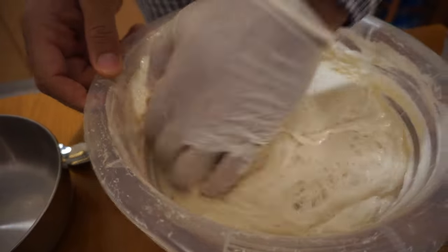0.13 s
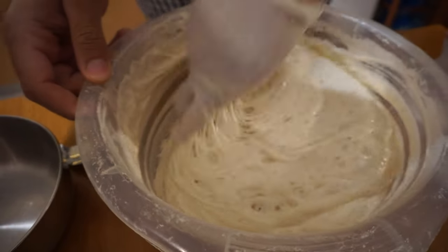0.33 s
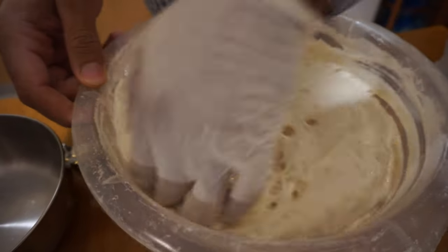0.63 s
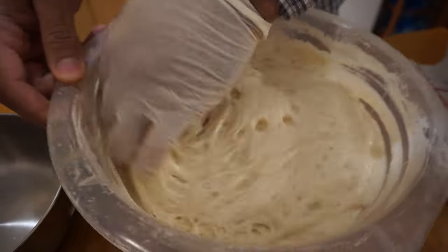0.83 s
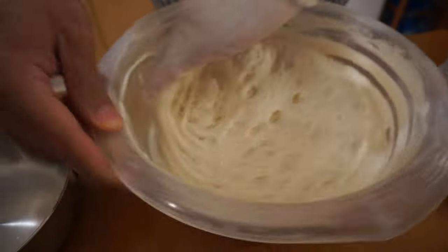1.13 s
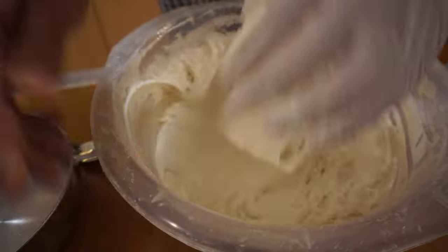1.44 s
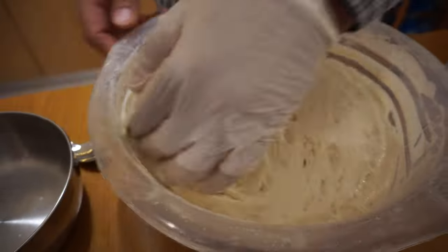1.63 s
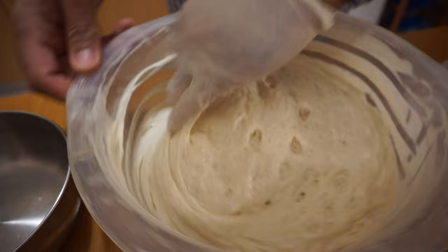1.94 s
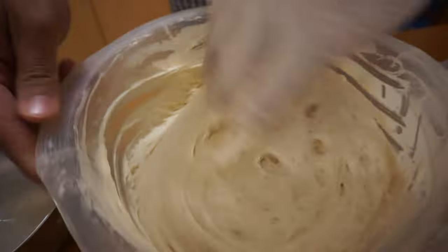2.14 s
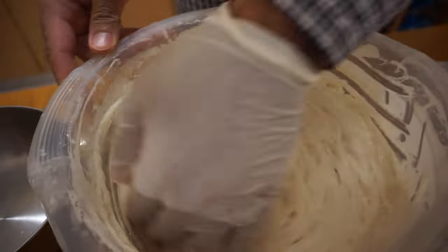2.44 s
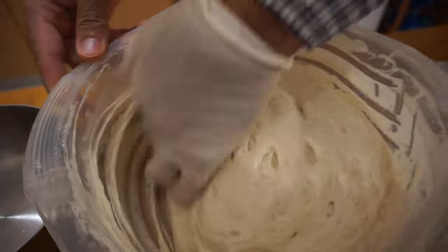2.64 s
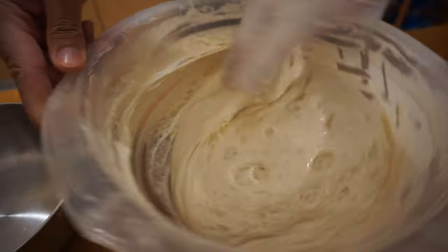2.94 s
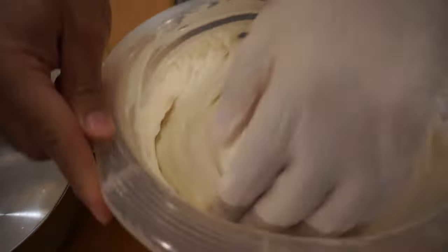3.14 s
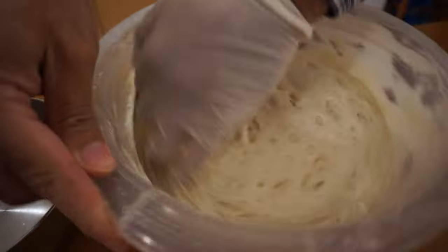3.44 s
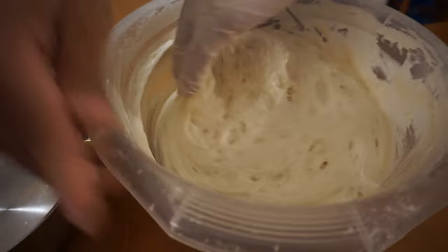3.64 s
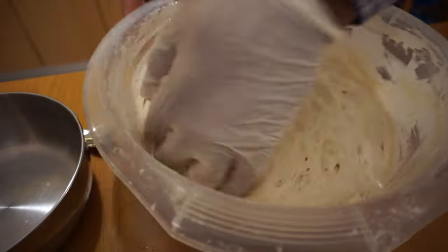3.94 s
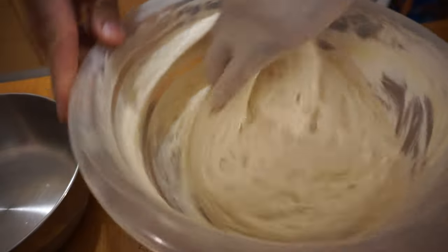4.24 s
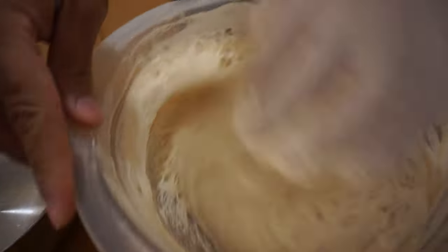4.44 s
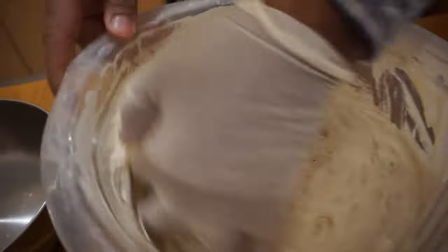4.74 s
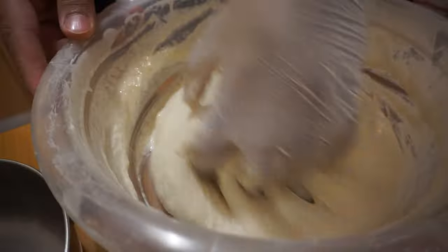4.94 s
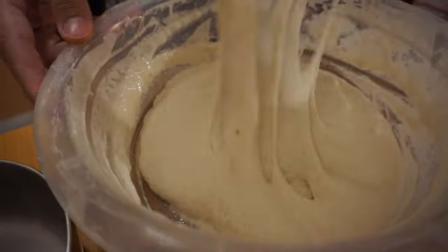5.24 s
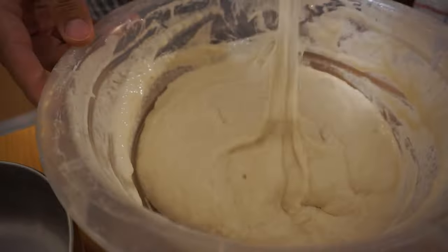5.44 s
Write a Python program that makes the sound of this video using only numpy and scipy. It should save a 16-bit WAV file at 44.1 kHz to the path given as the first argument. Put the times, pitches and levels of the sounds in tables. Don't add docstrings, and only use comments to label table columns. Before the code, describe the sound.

A gloved hand drags and folds wet, airy dough around a plastic bowl in quick repeated sweeps. Rasping, squelchy tearing comes with tiny snaps and bursting bubbles. The bowl thuds on a wooden table, hardest just after two and three seconds, and briefly brushes a metal pan handle early on. It ends with quiet sticky strands letting go. Close stereo microphones in a small kitchen, with faint room tone and slight echo.

```python
import sys
import numpy as np
from scipy import signal
from scipy.fft import rfft, irfft, next_fast_len
from scipy.io import wavfile

SR = 44100
rng = np.random.default_rng(int(sys.argv[2]) if len(sys.argv) > 2 else 0)


def unload_audio(sound):
    columns = np.transpose(np.atleast_2d(sound))
    steps = np.round(np.clip(columns, -1, 1) * 32767)
    wavfile.write(sys.argv[1], SR, steps.astype(np.int16))


def magnitude_from_level(level_db):
    exponent = np.asarray(level_db, float) / 20
    return 10 ** exponent


N = 246846

# [f/Hz, density/dB per Hz]
ROOM_TONE = [(15, -43), (25, 6.5), (95, -10), (238, -5), (288, -10), (339, -12.5), (1250, -20),
             (1680, -15.5), (3810, -30.5), (15200, -16.5), (16500, -41)]
ROOM_TONE_DB = -52.5
# [f/Hz, share/1]
COMMON_SHARE = [(100, 0.98), (250, 0.57), (500, 0.82), (1000, 0.81), (2000, 0.65), (4000, 0.092),
                (8000, 0.074), (14000, 0.25)]
# [f/Hz, left-right/dB]
LEAN = [(60, 3.5), (110, -1), (200, -1.5), (380, 1.5), (700, -1), (1290, -1.5), (2380, -3.5), (4400, 1),
        (8120, -2), (15000, -6)]
RIGHT_LAG_SAMPLES = 2
KITCHEN_DECAY_SCALE_S, KITCHEN_DB = 0.93, -14.5

# [f/Hz, level/dB, t60/s]
HANDLE_MODES = [(2132, 1, .2), (5630, -1, .045), (9920, -6, .02), (10900, -8, .02), (13100, -9, .015),
                (15500, -7, .012)]
# [t/s, rise/s, fall/s, level/dB, high modes/dB]
HANDLE_BRUSHES = [
    (.2, .01, 0.066, -40.5, 4),
    (.255, 0.04, 0.02, -35.5, -16),
    (3.07, 0.022, 0.031, -45.5, -16),
]
# [t/s, rise/s, fall/s, level/dB]
RIM_FLICKS = [
    (2.347, 0.0047, 0.024, -14.5),
    (2.42, 0.15, 0.11, -31),
]
# [f/Hz, width/Hz, level/dB]
RIM_RESONANCES = [(10800, 2200, 0), (14800, 900, -6)]

# [t/s, rise/s, fall/s, level/dB]
ROCKS = [
    (2.28, 0.044, 0.069, -32.5),
    (2.39, .02, 0.027, -40),
]
ROCKING_HZ = 161
# [f/Hz, width/Hz, [t/s, rise/s, fall/s, level/dB]]
HELD_MODES = [
    (413.7, 12, [(2.69, 0.023, 0.099, -42.5), (3.56, 0.038, 0.077, -49.5)]),
    (267, 96, [(2.335, 0.007, 0.22, -42), (4.44, 0.0103, 0.031, -37)]),
    (378, 100, [(3.158, .004, 0.049, -38.5)]),
    (1060, 440, [(1.3, 0.1, .08, -48)]),
    (640, 280, [(3.162, 0.0087, 0.17, -39.5), (2.215, .01, 0.055, -39)]),
    (753, 150, [(.34, 0.08, 0.3, -47.5)]),
    (1080, 250, [(.33, .1, 0.084, -44)]),
    (1680, 360, [(1.5, 0.085, .12, -60.5), (5.14, 0.056, 0.23, -54.5), (5.5, 0.67, .6, -65)]),
    (220, 42, [(5.17, 0.04, 0.15, -52), (5.43, 0.27, 0.032, -54)]),
]
# [f/Hz, level/dB, t60/s]
BOWL_MODES = [(64, -22.5, .2), (155, -3.5, .11), (132, -14, .05), (218, -13, .1), (255, -12, .1),
              (297, -17, .08), (524, -22, .06), (560, -23, .05), (640, -18, .06), (770, -22, .04),
              (960, -22, .03), (1130, -24, .03), (1700, -28, .015), (2300, -26, .012)]
# [t/s, peak/dB, hardness/dB, weight on worktop/dB]
KNOCKS = [(0.092, -32, -10, -3), (0.964, -30.5, 11.5, -15), (1.031, -25.5, -8, -2), (1.617, -37, 9, -3),
          (2.099, -28, 17.5, -16), (2.117, -23, -6, -13), (2.195, -40, 5, -8), (2.2031, -12, -5, 6.5),
          (2.2168, -20.5, -16, 7), (2.326, -14.5, -7, -20), (3.153, -9.5, 2, -7), (3.181, -22, -26, -2),
          (3.882, -43, -12, 0), (3.949, -37, -12, 2), (4.371, -25, 14, -29), (4.389, -30, 21.5, -18),
          (4.4414, -20.5, -3, -31), (4.471, -28, -4, -22), (4.537, -37, 13, -9), (4.717, -36.5, 0, 5),
          (4.932, -33, 2, 0.5)]
GRIP_DAMPING = 0.57

# [f/Hz, width/Hz, [t/s, rise/s, fall/s, level/dB]]
FILMS = [
    (8400, 2900, [(.684, 0.016, 0.027, -42), (.86, .15, 0.097, -49), (1.95, 0.3, .15, -49), (3.47, 0.14, .04, -46), (4.38, .01, 0.024, -39), (4.68, 0.011, .05, -38.5), (4.77, 0.13, 0.11, -42)]),
    (3900, 630, [(1.1, .1, .3, -45), (3.55, .03, .06, -44), (3.89, .01, .02, -51)]),
    (10500, 1800, [(.205, .015, .06, -41), (.285, .03, .04, -44)]),
    (12900, 7700, [(2.9, .015, .05, -45), (3.528, .01, .055, -37), (6.8, .025, .03, -45), (4.59, 0.033, .04, -44), (1.628, .012, .015, -50), (0.595, .12, .05, -50), (4.47, .1, .1, -51), (2.78, .06, .08, -46), (3.8, .05, .04, -51), (3.61, .04, .09, -53)]),
    (2100, 1700, [(4.6, .06, 0.079, -50), (2.355, .015, .03, -50), (1.2, 0.073, 0.068, -59), (5.13, .05, .06, -50)]),
    (5000, 4200, [(5.38, .4, 0.7, -62.5), (3.79, .1, .1, -63), (1.5, .08, .08, -61)]),
    (2500, 350, [(5.45, 0.23, .3, -64)]),
    (1680, 200, [(5.4, 0.22, 0.46, -63), (0.51, 0.18, 0.18, -64)]),
    (700, 150, [(.48, .2, 0.18, -59)]),
]
# [t/s, peak/dB, f/Hz, ring width over pitch/1, left-right/dB]
SNAPS = [(.1915, -30, 5650, .3, -2), (.2477, -28, 9000, 1.2, -1), (.2845, -22, 10500, .5, 0),
         (0.3444, -25, 4500, 0.46, -1), (.6307, -29, 11500, .5, -3), (.6364, -21, 4500, 1.6, -1),
         (0.639, -26, 11500, 0.33, -5), (0.639, -19.5, 11400, 0.27, -13), (0.6398, -20.5, 5000, 1.7, 3),
         (.6443, -30, 11000, .4, -3), (.6525, -33, 497, 0.92, 0), (.6787, -30, 6500, .8, 0),
         (0.686, -28, 4500, 1, 0), (.7917, -25, 9000, 1.2, 0), (1.486, -35, 8800, 0.3, -16),
         (1.5328, -35, 12500, 0.62, -12), (1.584, -41, 10600, .4, -6), (1.622, -37, 1700, .5, 0),
         (2.3255, -19, 1710, 0.32, -5), (3.2344, -25, 7800, .5, -4), (3.3037, -22.5, 11300, 0.82, -7),
         (4.6515, -26, 12500, .4, -9), (4.7233, -32, 850, 0.64, -1), (4.8082, -13, 9000, 1.8, -4),
         (4.8095, -11, 8500, 1.2, -4), (4.8095, -12, 13500, .7, -5), (4.539, -34, 4200, 0.76, -7),
         (3.6365, -26, 3600, .9, 0), (3.95, -37.5, 990, 0.36, 0), (3.915, -34, 2200, .5, 0),
         (2.745, -33, 13000, .8, -2), (4.3737, -26, 2500, 0.53, -1), (.838, -32, 9000, .5, 2),
         (.8685, -31, 9500, 0.44, 2), (2.2064, -19, 2300, 0.42, 0), (4.8093, -21, 3020, 0.37, -4),
         (4.9417, -27, 11500, .5, -8), (4.954, -32, 2300, .4, -4), (5.204, -43, 1750, .3, -5)]
# [t/s, peak/dB, f/Hz, ring width over pitch/1]
MORE_SNAPS = [(2.2073, -22.5, 3900, 1.1), (3.891, -34, 3150, 0.11), (3.897, -38, 3100, .15),
              (3.908, -39, 3400, .2), (3.9135, -35, 1400, .6), (3.919, -35, 2500, .6),
              (4.6497, -36, 11000, 1.2), (4.6535, -36, 4000, .3), (4.6573, -30, 8000, 1.5),
              (4.3812, -34, 1300, 0.7), (3.1572, -23, 666, 0.21), (3.17, -27, 700, .35),
              (4.9459, -24, 7300, 1.1), (4.9423, -30, 13000, .6)]
# [t/s, peak/dB, f/Hz, crack over pocket/dB, left-right/dB]
POPS = [(0.09, -25.5, 2920, -1, -4), (0.344, -26.5, 1210, -5, -1.1), (0.6394, -24, 2420, -6, 1),
        (0.6874, -28, 3560, -8, 6), (1.486, -55, 1730, 15, -13), (2.4324, -27, 1720, -10.5, -1.5),
        (3.2345, -25, 3900, -5, -3), (3.6368, -23, 1400, -18, -5), (3.8845, -32.5, 4200, -10, 20),
        (4.1067, -23, 1590, -11, 0), (4.373, -40, 1150, 7, 2), (4.539, -19, 1680, -14, -8),
        (4.59, -21, 2040, -24, -10), (4.6957, -26, 3580, -9, -5), (4.8096, -34, 3070, 0, -2),
        (4.9459, -18, 2600, 4, -12), (5.002, -29, 2660, -12, 3)]
POP_BREADTH, BREADTH_PER_DB = 1.05, .006
# [t/s, peak/dB, f/Hz, left-right/dB]
THREADS = [(0.102, -35, 1950, -2), (0.334, -35, 1820, 2.1), (0.63, -40, 1208, -1), (0.7914, -40, 1790, -1),
           (0.8384, -37, 2590, 2), (0.8685, -40, 2730, 12), (1.3616, -29.5, 1150, -4),
           (1.6496, -36.5, 3700, -.6), (3.267, -32, 2500, -11), (4.562, -40, 2230, -3.5),
           (4.9765, -33, 2300, -4), (5.0674, -23, 3570, 2), (5.098, -38, 2500, -3), (5.1562, -36, 1940, -5),
           (5.187, -40, 1690, -12), (5.286, -40.5, 1760, -6), (5.354, -43, 2380, -2.5),
           (5.5023, -37.5, 2070, -5)]
# [t/s, peak/dB, f/Hz, crack/dB, left-right/dB]
SLAPS = [
    (2.2063, -21.5, 1820, -20, 8),
    (2.326, -36, 1600, -24, -7),
    (3.1557, -14.5, 1970, -37, -3),
]
# [t/s, peak/dB, left-right/dB]
TICKS = [
    (0.6414, -23, -6),
    (4.6529, -27, -11),
]
# [t/s, peak/dB, f/Hz]
SMACKS = [
    (2.2056, -14.5, 665),
    (2.325, -21.5, 617),
    (3.156, -17.5, 560),
    (4.373, -30, 700),
    (4.4435, -29.5, 640),
    (4.539, -23, 626),
]

# [t of peak speed/s, rise/s, fall/s, level/dB]
SLIDES = [(0.003, 0.82, 0.019, -44.5), (0.088, 0.0071, 0.92, -46), (0.201, 0.05, 0.22, -37),
          (0.634, 0.014, 0.6, -47.5), (1.032, 0.086, 0.32, -36.5), (1.276, 0.68, 0.21, -42),
          (1.778, 0.19, 0.566, -43.5), (2.002, 0.29, 0.2, -38), (2.194, 0.036, 0.1, -46.5),
          (2.345, 0.012, 0.4, -42.5), (2.694, 0.16, 0.12, -40.5), (2.879, 0.17, 0.67, -45.5),
          (3.154, 0.028, 0.24, -41), (3.54, 0.25, 0.06, -36.5), (3.657, 0.88, 0.11, -52.5),
          (3.88, 0.0041, 0.34, -46), (4.003, 0.018, 0.071, -39.5), (4.234, 0.37, 0.18, -38.5),
          (4.374, 0.0069, 0.094, -42), (4.818, 0.37, 0.3, -39.5), (5.111, 0.084, 0.19, -50.5)]
# [topmost hiss/dB, left-right/dB]
SLIDE_COLOUR = [(-3, -4), (1, -1), (0, 2.5), (1.5, 1), (-4, -2.5), (-0.5, 0.5), (-1.5, 1), (-4.5, 0.5),
                (0, 0), (2, 1), (1.5, 1.5), (-0.5, -1), (-6, -1), (0.5, -0.5), (4, 0.5), (0.5, 0), (-6, 0),
                (-1, 0.5), (0, -0.5), (-2, 0.5), (3.5, -2.5)]
# [t of peak force/s, rise/s, fall/s, level/dB, wetness/dB]
FOLDS = [(-0.033, 0.012, 0.064, -42.5, -12), (0.099, 0.021, 0.086, -48, 0),
         (0.295, 0.19, 0.23, -45.5, -1.5), (0.631, 0.043, 0.08, -45, -0.5), (0.777, 0.11, 0.22, -48, 0),
         (1.33, 0.6, 0.19, -46, -0.5), (1.702, 0.1, 0.9, -53.5, 4.5), (2.016, 0.16, 0.22, -43, -3),
         (2.206, 0.028, 0.11, -38.5, -7), (2.329, 0.025, 0.4, -42, -4.5), (2.685, 0.11, 0.34, -39.5, -2.1),
         (3.15, 0.0047, 0.076, -38, -4), (3.167, 0.48, 0.032, -46, 2.5), (3.543, 0.026, 0.12, -48.5, 14.5),
         (3.626, 0.57, 0.18, -41.5, -0.1), (3.905, 0.032, 0.087, -52, 5.5), (4.154, 0.25, 0.49, -41, 1),
         (4.374, 0.013, 0.037, -40.5, 4), (4.594, 0.22, 0.068, -42.5, -0.5),
         (4.737, 0.047, 0.065, -41.5, -2.5), (4.875, 0.14, 0.16, -40, -3), (5.13, 0.38, 0.066, -56.5, 7.5)]
# [t of peak weight/s, rise/s, fall/s, level/dB]
SHIFTS = [(0.088, 0.0087, 0.64, -52), (0.628, 0.079, 0.49, -46.5), (1.033, 0.21, 0.53, -47),
          (1.619, 0.0079, 0.66, -48.5), (2.103, 0.019, 0.068, -41), (2.21, 0.02, 0.096, -32.5),
          (2.527, 0.663, 0.018, -52.5), (3.16, 0.0067, 0.16, -33.5), (3.478, 0.65, 0.022, -50),
          (3.801, 0.049, 0.021, -52), (3.96, 0.13, 0.86, -57), (4.449, 0.17, 0.076, -40),
          (5.011, 0.54, 0.11, -48.5), (5.162, 0.038, 0.26, -50.5), (5.439, 0.11, 0.02, -66)]
# [t/s, rise/s, fall/s, level/dB]
TEARS = [(.686, 0.014, 0.026, -43), (2.28, .06, 0.077, -52), (2.5, 0.069, 0.031, -59),
         (2.625, 0.038, 0.019, -37), (2.674, .006, .07, -38), (3.524, .004, .06, -36),
         (2.8, .008, 0.018, -57), (.64, .012, .03, -40.5), (5.1, .004, 0.015, -57), (3.7, .03, 0.021, -46),
         (1.616, .004, .04, -52), (1.45, .08, .1, -62), (5.16, .04, 0.088, -60)]
SETTLING_DB = -64
SWELL_DB, SWELL_ROUNDNESS = 20, 1.4
SLIDE_IN_WALL_DB, SLIDE_IN_SQUELCH_DB, FOLD_IN_HISS_DB = -12, -5, -9.5
FOLD_IN_DRAG_DB, DRAG_DB = -7.5, 6
# [f/Hz, density/dB per Hz]
SMEAR_SPECTRUM = [(190, -37), (330, -6), (370, -8.5), (408, -18.5), (473, -7), (689, -0.5), (1160, -4.5),
                  (2770, -3.5), (3370, -16), (3780, -3), (14200, -7), (15700, -15), (16500, -35)]
# [f/Hz, width/Hz, gain/dB]
HOLLOW = [(418, 106, -3), (634, 63, 3.5), (1113, 244, 4), (1670, 88, 2), (2390, 580, 2.5), (3850, 340, 2.5),
          (6300, 520, -2), (7930, 630, 1.5), (10400, 3600, 1)]


def rms_one(x):
    return x / np.sqrt(np.mean(x ** 2) + 1e-20)


def sides(left_right_db):
    return magnitude_from_level(left_right_db / 2 * np.array([[1], [-1]]))


def at_hz(points, hz):
    table = np.array(points)
    return np.interp(np.log(hz), np.log(table[:, 0]), table[:, 1])


def high_pass(x, order, hz):
    return signal.sosfilt(signal.butter(order, hz, "high", fs=SR, output="sos"), x)


def soft(x, hz):
    r = np.exp(-2 * np.pi * hz / SR)
    return signal.lfilter([(1 - r) ** 2], [1, -2 * r, r * r], x)


def resonate(x, hz, width_hz):
    r = np.exp(-np.pi * width_hz / SR)
    poles = [1, -2 * r * np.cos(2 * np.pi * hz / SR), r * r]
    return signal.lfilter([(1 - r * r) / 2, 0, (r * r - 1) / 2], poles, x)


def resonate_twice(x, hz, width_hz):
    return resonate(resonate(x, hz, width_hz), hz, width_hz)


def ring(clicks, hz, t60_s):
    r = magnitude_from_level(-60 / (t60_s * SR))
    w = 2 * np.pi * hz / SR
    return signal.lfilter([0, np.sin(w)], [1, -2 * r * np.cos(w), r * r], clicks + 1e-18)


def drift(rate_hz):
    r = np.exp(-16 * np.pi * rate_hz / SR)
    slow = signal.lfilter([1], [1, -2 * r, r * r], rng.standard_normal(N // 8 + 4002))[4000:]
    return np.interp(np.arange(N) / 8, np.arange(len(slow)), rms_one(slow))


def slips(per_s, spread_db, length_s):
    happens = rng.random(N) < per_s / SR
    sizes = magnitude_from_level(spread_db * np.minimum(rng.exponential(1, N), 5)) * happens
    return rms_one(signal.lfilter([1], [1, -np.exp(-1 / (length_s * SR))], sizes))


def swells(rows, extra=False):
    t, power = np.arange(0, N + 32, 32) / SR, 1e-12
    for peak_s, rise_s, fall_s, level_db, *more_db in rows:
        away = np.maximum((peak_s - t) / max(rise_s, .002), (t - peak_s) / max(fall_s, .002))
        power = power + magnitude_from_level(2 * (level_db + extra * sum(more_db) - SWELL_DB * away ** SWELL_ROUNDNESS))
    return np.interp(np.arange(N) / SR, t, power)


def two_ears(x):
    size = next_fast_len(N + 64)
    turn = np.exp(-2j * np.pi * np.arange(size // 2 + 1) / size * RIGHT_LAG_SAMPLES)
    late = irfft(rfft(x, size) * turn, size)
    return np.array([x, late[:N]])


def banded(excite, spectrum, low_hz, level_db, patchy_db):
    out = np.zeros((2, N))
    edges = np.geomspace(low_hz, 16500, round(2.3 * np.log2(16500 / low_hz)))
    white = excite * rng.standard_normal((2, 3, N))
    common = [two_ears(w[0]) for w in white]
    own = [w[1:] for w in white]
    for k, (low, high) in enumerate(zip(edges, edges[1:])):
        hz = np.sqrt(low * high)
        share = np.clip(at_hz(COMMON_SHARE, hz), 0, 1)
        mixed = np.sqrt(share) * common[k % 2] + np.sqrt(1 - share) * own[k % 2]
        band = signal.sosfilt(signal.butter(2, [low, high], "band", fs=SR, output="sos"), mixed)
        gain = magnitude_from_level(at_hz(spectrum, hz)) * sides(at_hz(LEAN, hz))
        out += gain * magnitude_from_level(level_db(hz) + patchy_db * drift(18.6)) * band
    return out


def room_tone():
    return magnitude_from_level(ROOM_TONE_DB) * rms_one(banded(1, ROOM_TONE, 25.4, lambda hz: 0, patchy_db=-2.5))


def kitchen(x):
    size = next_fast_len(N + SR // 2)
    hz = np.arange(size // 2 + 1) * SR / size
    heard, out = rfft(x, size), np.zeros((2, size // 2 + 1), complex)
    low_cut = hz ** 2 / (hz ** 2 + 900 ** 2)
    for k, lag_s in enumerate(rng.uniform(.008, .035, 12)):
        loss = magnitude_from_level(-60 * lag_s / KITCHEN_DECAY_SCALE_S * (4.0 + hz / 9000))
        loop = loss * np.exp(-2j * np.pi * hz * lag_s)
        out[k % 2] += heard * loop / (1 - loop) * (-1) ** (k // 2) * low_cut
    return irfft(out, size)[:, :N]


def handle():
    rub, out = rng.standard_normal(N), np.zeros(N)
    for k, (hz, mode_db, t60_s) in enumerate(HANDLE_MODES):
        force = rub * magnitude_from_level(mode_db) * np.sqrt(swells(HANDLE_BRUSHES, extra=k > 0))
        out += ring(force, hz, t60_s) / np.sqrt(t60_s * SR / 28)
    return out


def rim_flick():
    grain = rms_one(1.5 + slips(400, 3.5, 0.0025))
    rasp = rng.standard_normal((2, N)) * grain * np.sqrt(swells(RIM_FLICKS))
    return sum(magnitude_from_level(gain_db) * resonate_twice(rasp, hz, width_hz) for hz, width_hz, gain_db in RIM_RESONANCES)


def rocking():
    return np.sqrt(2 * swells(ROCKS)) * np.sin(2 * np.pi * ROCKING_HZ * np.arange(N) / SR)


def creak():
    rub = rng.standard_normal(N)
    return sum(np.sqrt(swells(rows)) * rms_one(resonate_twice(rub, hz, width_hz))
               for hz, width_hz, rows in HELD_MODES)


def bowl(drag_db):
    table = np.array(KNOCKS)
    peak_db, hardness_db, weight_db = table[:, 1], table[:, 2], table[:, 3]
    at = np.round((table[:, 0] + .002) * SR).astype(int)
    luck = rng.standard_normal((len(table), len(BOWL_MODES)))
    shake = rng.standard_normal(N) * rms_one(1.2 + slips(90, 3.9, 0.008)) * magnitude_from_level(drag_db)
    drag, knocks = np.zeros(N), np.zeros(N)
    for k, (hz, level_db, t60_s) in enumerate(BOWL_MODES):
        worktop = k < 3
        clicks = np.zeros(N)
        reach_db = hardness_db * np.log2(hz / 150) / 3 + weight_db * worktop
        clicks[at] = magnitude_from_level(peak_db + level_db + reach_db + 2 * luck[:, k])
        knocks += ring(clicks, hz, (.85 if worktop else GRIP_DAMPING) * t60_s)
        drag += magnitude_from_level(level_db - 14.4 * worktop) * ring(shake, hz, 0.99 * t60_s)
    drag = high_pass(drag, 4, 120)
    return magnitude_from_level(-20) * soft(drag, 580) + magnitude_from_level(-3.0) * soft(knocks, 2500)


def films():
    common, left, right = rng.standard_normal((3, N)) * rms_one(1.5 + .6 * slips(300, 4.3, .002))
    rub = 0.71 * common + np.array([left, right])
    return sum(np.sqrt(swells(rows)) * rms_one(resonate_twice(rub, hz, width_hz))
               for hz, width_hz, rows in FILMS)


def snaps():
    out, click = np.zeros((2, N)), np.arange(600) == 0
    for s, peak_db, hz, breadth, pan_db in SNAPS + [(*row, -2) for row in MORE_SNAPS]:
        sound = resonate_twice(-1. * click, hz, np.clip(breadth, .1, 2.5) * hz)
        i = round(s * SR)
        out[:, i:i + len(click)] += magnitude_from_level(peak_db) * sides(pan_db) * sound / np.abs(sound).max()
    return out


def all_bursts():
    large = [(*row, POP_BREADTH + BREADTH_PER_DB * row[3]) for row in POPS]
    threads = [(s, db, hz / 1.02, -26, pan_db, 0.33) for s, db, hz, pan_db in THREADS]
    slaps = [(*row, 0.69) for row in SLAPS]
    ticks = [(s, db, 8000, -7, pan_db, 1.8) for s, db, pan_db in TICKS]
    smacks = [(s, db, hz, -14, 0, 0.72) for s, db, hz in SMACKS]
    return large + threads + slaps + ticks + smacks


def pops():
    out, t = np.zeros((2, N)), np.arange(900) / SR
    for s, peak_db, hz, crack_db, pan_db, breadth in all_bursts():
        scatter = rng.standard_normal(len(t)) * np.exp(-t / .0024) * np.minimum(t / .0007, 1)
        snap = (t == 0) + .12 * scatter
        width_hz = np.clip(breadth, .15, 2.5) * hz
        pocket = resonate(resonate(snap, hz, width_hz), 1.1 * hz, 1.3 * width_hz)
        pocket = high_pass(pocket, 2, .75 * hz)
        crack = high_pass(snap, 2, 1.8 * hz)
        sound = magnitude_from_level(peak_db + 1.0) * (pocket / np.abs(pocket).max() + magnitude_from_level(crack_db + 12.5) * crack)
        i = round(s * SR)
        out[:, i:i + len(t)] += (sound * sides(pan_db))[:, :N - i]
    return out


def kneading():
    slide, shift = swells(SLIDES), swells(SHIFTS)
    fold, wet = swells(FOLDS), swells(FOLDS, extra=True)
    torn = swells(TEARS) + magnitude_from_level(2 * SETTLING_DB)
    drag = magnitude_from_level(2 * DRAG_DB) * (shift + magnitude_from_level(2 * FOLD_IN_DRAG_DB) * fold)
    wall = fold + magnitude_from_level(2 * SLIDE_IN_WALL_DB) * slide + magnitude_from_level(-18) * torn
    squelch = wet + magnitude_from_level(2 * SLIDE_IN_SQUELCH_DB) * slide + torn
    hiss = slide + magnitude_from_level(2 * FOLD_IN_HISS_DB) * wet + magnitude_from_level(-10) * torn
    return 10 * np.log10([drag, wall, squelch, hiss])


def slide_colour(column):
    rows = [(*row, colour[column]) for row, colour in zip(SLIDES, SLIDE_COLOUR)]
    return 10 * np.log10(swells(rows, extra=True) / swells(rows))


def smear(wall_db, squelch_db, hiss_db):
    tearing = rms_one(1.94 + .5 * slips(500, 3.5, 0.0014) + 0.28 * slips(40, 0.61, 0.0043))
    levels = np.array([wall_db, squelch_db, hiss_db, hiss_db + slide_colour(column=0)])

    def level_db(hz):
        place = np.interp(np.log(hz), np.log([900, 2600, 8000, 13500]), [0, 1, 2, 3])
        k = min(int(place), 2)
        blend = levels[k] + (place - k) * (levels[k + 1] - levels[k])
        return blend + [-30, -31, -33, -34][round(place)] + 44.5

    out = banded(tearing, SMEAR_SPECTRUM, 304.0, level_db, patchy_db=1.5)
    for hz, width_hz, gain_db in HOLLOW:
        out = out + (magnitude_from_level(gain_db) - 1) * resonate(out, hz, width_hz)
    return out * sides(slide_colour(column=1))


def scene():
    drag_db, wall_db, squelch_db, hiss_db = kneading()
    body = bowl(drag_db) + creak() + rocking()
    bursts = pops() + snaps() + rim_flick()
    near = two_ears(body) + two_ears(handle()) * sides(-3) + bursts
    echo = magnitude_from_level(KITCHEN_DB) * kitchen(near.mean(axis=0))
    return near + echo + smear(wall_db, squelch_db, hiss_db) + room_tone() + films()


def roll_off(x):
    return signal.sosfilt(signal.butter(12, 15810, fs=SR, output="sos"), x)


def record(dry):
    x = high_pass(dry, 3, 58)
    x = signal.sosfilt(signal.ellip(10, .5, 55, 15760, fs=SR, output="sos"), x)
    return roll_off(x)


dry = scene()
out = record(dry)
unload_audio(out)
```